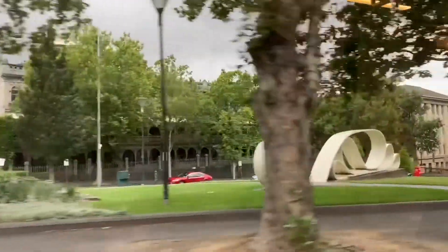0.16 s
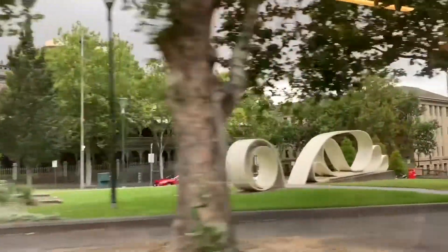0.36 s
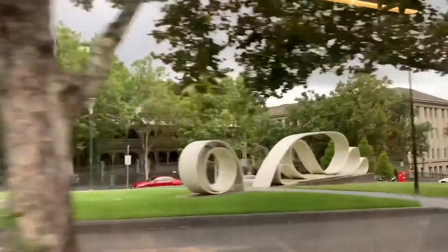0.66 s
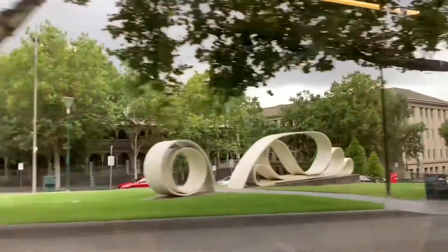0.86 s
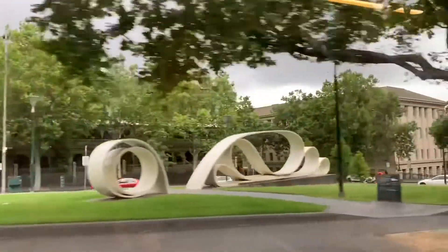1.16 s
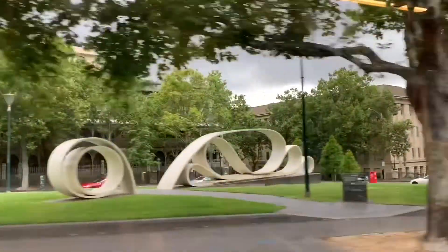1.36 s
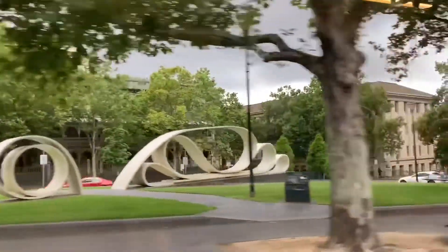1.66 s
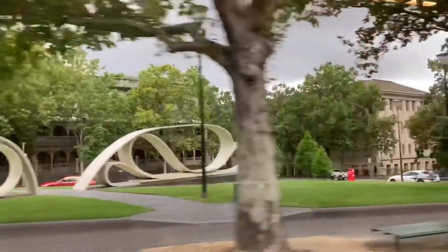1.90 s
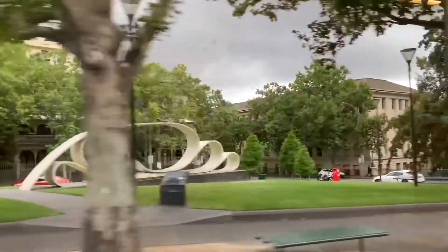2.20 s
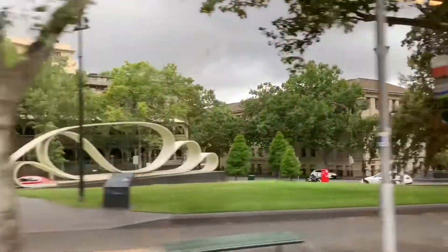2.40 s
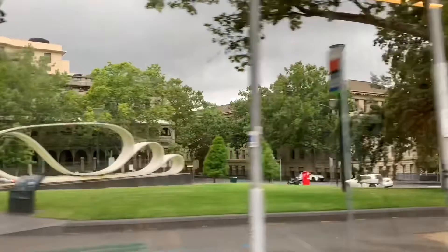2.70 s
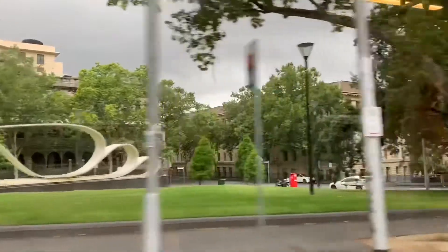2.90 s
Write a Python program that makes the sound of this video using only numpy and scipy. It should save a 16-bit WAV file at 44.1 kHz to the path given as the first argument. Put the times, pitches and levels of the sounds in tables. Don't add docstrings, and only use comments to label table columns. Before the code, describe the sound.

Tram rumbling at steady speed, heard from inside the cabin, with low hum and soft thuds

```python
import sys
import numpy as np
from scipy import signal
from scipy.fft import rfft, irfft, next_fast_len
from scipy.io import wavfile
from scipy.ndimage import uniform_filter1d

SR = 44100
rng = np.random.default_rng(int(sys.argv[2]) if len(sys.argv) > 2 else 0)


def ratio(d):
    e = np.asarray(d, float) / 20
    return 10 ** e


def int16_out(signal):
    q = np.round(np.clip(np.atleast_2d(signal).T, -1, 1) * 32767)
    wavfile.write(sys.argv[1], SR, q.astype(np.int16))


N = 134505
SKIP_AT_S = 2.75231


def walk(rate):
    hold = int(SR / rate)
    held = np.repeat(rng.standard_normal(N // hold + 1), hold)
    return 1.64 * uniform_filter1d(uniform_filter1d(held, hold), hold)[:N]


def on_log(hz, table, axis=1):
    rows = np.array(table, float)
    return np.interp(np.log(hz + 1), np.log(rows[:, 0]), rows[:, axis])


def in_time(table):
    rows = np.array(table, float)
    return np.interp(np.arange(N) / SR, rows[:, 0], rows[:, 1])


def swing(table):
    level = in_time(table)
    return level - level.mean()


# frequency in Hz, likeness 0-1,
# lead of the right port in rad, left over right in dB.
PORTS = [(40.2, 0.99, 0, 2), (177, 0.92, 0.45, -2), (310, 0.48, 0.05, -0.5), (520, 0.26, -1, 0.5),
         (925, 0.23, -1, 0), (1420, 0.41, -3.5, 0), (2500, 0.3, -4.5, -1), (4560, 0.22, -5.5, -1),
         (6440, 0.26, -9.5, -3.5)]


def noise(colour, swell_db, flicker_db, point=False):
    size = next_fast_len(N)
    hz = np.fft.rfftfreq(size, 1 / SR)
    common, separate = rfft(rng.standard_normal((2, size)))
    if point:
        lag_s, in_phase_hz = 0.00022, 9400
        like, pan_db = 0.985, 0 * hz
        lead = 2 * np.pi * (hz - in_phase_hz) * lag_s
    else:
        like, lead, pan_db = (on_log(hz, PORTS, axis=k) for k in (1, 2, 3))
    like = np.clip(like, 0, 1)
    left = common * ratio(pan_db / 2)
    right = like * np.exp(1j * lead) * common + np.sqrt(1 - like ** 2) * separate
    pair = np.array([left, right * ratio(-pan_db / 2)])
    pair *= ratio(on_log(hz, colour)) * np.sqrt(SR / 2)

    ripple_hz, ripple_db = 27.96, 2.5
    comb = rng.standard_normal(int(SR / 2 / ripple_hz) + 2)
    depth_db = ripple_db * np.clip(hz / 900, 0, 1) / (1 + hz / 5000)
    pair *= ratio(depth_db * np.interp(hz / ripple_hz, np.arange(len(comb)), comb))

    lowest, highest = colour[0][0], colour[-1][0]
    half_octaves = 2 * np.log2((hz + 1) / lowest)
    out = 0
    for k in range(int(2 * np.log2(highest / lowest)) + 1):
        band = np.cos(np.pi / 2 * np.clip(half_octaves - k, -1, 1)) ** 2
        out = out + irfft(pair * band, size)[:, :N] * ratio(swell_db + flicker_db * walk(8.72))
    return out


def tone(phase, db, lead, pan_db):
    left = ratio(pan_db / 2) * np.sin(phase)
    right = ratio(-pan_db / 2) * np.sin(phase + lead)
    return np.sqrt(2) * ratio(db) * np.array([left, right])


def ring(at, hz, db, length, lead, pan_db):
    t = np.arange(N) / SR - at
    return tone(2 * np.pi * hz * t, db, lead, pan_db) * np.exp(-(2.59 * t / length) ** 2)


# frequency in Hz, density in dB per Hz.
RUSH = [(1500, -81), (2300, -87), (3000, -85), (3600, -87), (4100, -84.5), (5000, -86), (5400, -95.5),
        (7500, -88.5)]
# frequency in Hz, density in dB per Hz.
VENT = [(5500, -100), (7300, -93.5), (8600, -89.5), (10000, -97.5), (12500, -100), (13800, -108),
        (15000, -114), (15700, -140)]


def air():
    puff_s, puff_length_s, puff_db = 2.18, 0.04, 2.5
    t = np.arange(N) / SR
    flutter = puff_db * np.exp(-((t - puff_s) / puff_length_s) ** 2)
    flutter = flutter + 0.12 * walk(17.0) + 0.5 * walk(40.5)
    rush = noise(RUSH, flutter, flicker_db=0.54)
    return rush + noise(VENT, 0.42 * flutter, flicker_db=0.1, point=True)


# time in seconds, level in dB.
SHAKE = [(0, -34.5), (.3, -34), (.55, -35.5), (.8, -38), (1.0, -37.5), (1.3, -35.5), (1.55, -37.5),
         (1.85, -35.5), (2.1, -39), (2.4, -36), (2.65, -35), (3.05, -42)]
# frequency in Hz, density in dB per Hz.
BODY = [(300, -73), (450, -59.5), (650, -69.5), (940, -70.5), (1030, -77), (1480, -73), (1620, -86.5),
        (2400, -87)]


def body_panels():
    return noise(BODY, 0.37 * swing(SHAKE) + 0.5 * walk(39.76), flicker_db=1.0)


# time in seconds, frequency in Hz, level in dB, length in seconds,
# lead of the right port in rad.
KNOCKS = [(0.006, 275, -25, 0.011, -0.2), (0.03, 727, -49, 0.089, 0), (0.08, 297, -27.5, 0.053, -0.5),
          (0.086, 454, -30.5, 0.036, 0.5), (0.108, 704, -41.5, 0.089, -1.7),
          (0.156, 295, -28.5, 0.049, -0.0), (0.223, 567, -32.5, 0.028, 1.3), (0.229, 437, -34, 0.058, 0.5),
          (0.235, 290, -29, 0.033, -0.2), (0.267, 775, -45, 0.046, -2), (0.305, 299, -28, 0.025, 0.3),
          (0.331, 448, -34.5, 0.086, -0.1), (0.349, 296, -31.5, 0.036, -0.0), (0.441, 775, -49, 0.028, 0.1),
          (0.505, 300, -26.5, 0.021, 0.8), (0.81, 388, -34.5, 0.027, 0.8), (0.894, 787, -40.5, 0.032, -0.1),
          (0.978, 400, -39.0, 0.052, 3), (1.012, 1050, -48, 0.034, 1.3), (1.187, 1087, -46, 0.053, 1),
          (1.193, 563, -35, 0.053, -3), (1.275, 543, -35, 0.072, -1.7), (1.303, 295, -29, 0.031, 0.1),
          (1.403, 654, -45.5, 0.09, 1.7), (1.417, 230, -31, 0.04, -0.5), (1.429, 530, -36.5, 0.08, -1.7),
          (1.499, 1060, -50.5, 0.027, 1), (1.548, 526, -36.5, 0.034, -1.0), (1.61, 786, -41, 0.026, 0),
          (1.756, 820, -37.5, 0.034, 1.3), (1.852, 762, -42.5, 0.077, 1.5), (1.896, 786, -40, 0.019, 2),
          (1.978, 925, -45.5, 0.023, 5), (2.508, 738, -45, 0.1, 1.5), (2.582, 844, -41, 0.023, -1.7),
          (2.584, 727, -45.0, 0.019, 2.2), (2.618, 1017, -49.0, 0.081, -0.3),
          (2.676, 752, -44.0, 0.047, 3.5), (2.688, 1053, -47, 0.041, 0), (2.754, 237, -35, 0.016, -1.5)]
# time in seconds,
# frequency in Hz, level in dB, length in seconds, lead of the right port in rad.
MORE_BLOWS = [(0.119, 100, -27, 0.035, 0.85), (0.21, 103, -21, .04, 0.082), (.58, 106, -30, 0.057, 0.029),
              (2.53, 106, -26, 0.047, 0.87), (0.749, 137, -23.5, 0.033, 0.5), (1.5, 300, -34, 0.026, -0.55),
              (1.541, 295, -30, 0.028, 0.32), (1.62, 290, -32, 0.027, 0.27), (1.625, 390, -42, 0.017, -.8),
              (1.704, 290, -37, 0.032, 0), (1.795, 260, -34, .022, 0.89), (2.176, 1500, -40, 0.0099, 1.34),
              (0.45, 280, -34, 0.035, 0), (1.085, 289, -30.5, 0.048, 0), (.935, 285, -33, .03, 0.16),
              (1.2, 302, -33.5, .03, 0.15), (.6, 285, -33.5, 0.045, 0.17), (2.95, 290, -35.5, 0.066, 0.21),
              (.95, 630, -41, .03, -1), (.96, 930, -45, 0.033, -0.85), (1.225, 490, -36, .025, -1),
              (0.46, 100, -31, 0.041, 0.62), (1.1, 600, -41, 0.033, -1), (1.83, 187, -33.5, .04, .3),
              (2.2, 980, -39, 0.0092, 1), (2.39, 300, -35.5, 0.058, -0.14), (2.48, 295, -34, 0.044, 0.16),
              (2.671, 305, -33, 0.047, -0.099), (2.715, 287, -32.5, 0.029, 0)]


def fittings():
    return sum(ring(*row, pan_db=-0.56) for table in (KNOCKS, MORE_BLOWS) for row in table)


# time in seconds, level in dB.
TRACK = [(0, -22.5), (.15, -24), (.45, -28), (.8, -27), (1.05, -28.5), (1.35, -26), (1.6, -36),
         (2.15, -31.5), (2.3, -28), (2.7, -26.5), (2.85, -29.5), (3.05, -28)]
# frequency in Hz, density in dB per Hz.
ROLL = [(20, -65), (45, -55), (82, -49), (100, -49.5), (165, -50), (215, -60.5), (295, -58), (345, -63)]
# time in seconds, frequency in Hz, level in dB, length in seconds.
THUDS = [(0.016, 161, -31.5, 0.098), (0.056, 158, -31.5, 0.13), (0.15, 160, -22, 0.057),
         (0.166, 130, -27, 0.049), (0.227, 181, -33.0, 0.09), (0.331, 170, -31, 0.045),
         (0.381, 136, -29, 0.033), (0.411, 199, -38.0, 0.032), (0.439, 144, -30, 0.074),
         (0.515, 156.6, -29.5, 0.091), (0.595, 151, -30, 0.044), (0.692, 165.4, -30.5, 0.064),
         (0.86, 153.3, -26.5, 0.13), (0.962, 170, -32.0, 0.035), (1.096, 156, -29, 0.058),
         (1.269, 124, -27, 0.014), (1.279, 161, -27.5, 0.058), (1.439, 152, -26.0, 0.064),
         (1.525, 194, -39, 0.015), (1.616, 164, -32, 0.067), (1.7, 161, -33.5, 0.12),
         (1.734, 208, -39.0, 0.041), (1.804, 151.6, -31.0, 0.056), (1.848, 176, -30, 0.052),
         (1.944, 198, -34, 0.03), (2.011, 170, -33.5, 0.085), (2.199, 171, -30, 0.066),
         (2.301, 168, -19, 0.046), (2.383, 163.4, -27.0, 0.11), (2.474, 143.4, -21.5, 0.085),
         (2.548, 174, -29.5, 0.068), (2.614, 135.6, -22, 0.079), (2.652, 143, -20.5, 0.058),
         (2.696, 129, -19, 0.042), (2.804, 124, -27.0, 0.0091), (2.943, 155, -31.5, 0.12)]


def wheels():
    out = noise(ROLL, 0.67 * swing(TRACK), flicker_db=0.13)
    for row in THUDS:
        lead = 0.67 + 0.55 * rng.standard_normal()
        pan_db = -3.0 + 1.6 * rng.standard_normal()
        out = out + ring(*row, lead, pan_db)
    return out


# time in seconds, level in dB.
MOTOR = [(0.03, -36), (0.08, -27.5), (0.16, -29), (0.21, -21), (0.43, -22), (0.51, -28), (1.03, -27.5),
         (1.29, -31), (1.56, -24), (1.83, -25.5), (1.91, -34.5), (2.01, -23), (2.34, -29), (2.53, -34.5),
         (2.58, -33.5), (3.0, -25)]
# multiple of the shaft rate, level in dB re the first, share of the level swings 0-1.
ORDERS_DB = [(1, 0, 0.75), (2, -3, 0.2), (3, -13.5, 0.63), (4, -23, 0.6)]
# frequency in Hz, level in dB, wobble in dB, lead of the right port in rad,
# share of the shaking 0-1.
TONES = [(283.7, -41.5, 2, 0.66, 0.3), (310, -50, 4, 1.5, 0.9), (445.5, -57, 2, -0.46, 0.5),
         (515, -59.5, 3, -0.058, 0.8), (912, -60, 3, -0.96, 0.3), (1282, -61, 6, 2.3, 0)]


def motor():
    motor_hz, lost_s = 53.66, 0.00458
    t = np.arange(N) / SR
    t = t + lost_s * np.clip((t - SKIP_AT_S) / 0.011 + 0.5, 0, 1)
    mean_db, hum_swing, shake_swing = in_time(MOTOR).mean(), swing(MOTOR), swing(SHAKE)
    turn = 2 * np.pi * (motor_hz * t + 0.021 * walk(3.6))
    out = 0
    for order, db, share in ORDERS_DB:
        level = mean_db + db + share * hum_swing + 1.6 * walk(14)
        out = out + tone(order * turn + 1.305 * order * order, level, lead=0.29, pan_db=-1.9)
    for hz, db, wobble_db, lead, share in TONES:
        phase = 2 * np.pi * hz * t + 0.76 * walk(hz / 40)
        level = db + share * shake_swing + wobble_db * walk(21.6)
        out = out + tone(phase, level, lead, pan_db=-0.4)
    return out


def scene():
    return air() + body_panels() + fittings() + wheels() + motor()


def top_cut(x):
    return signal.sosfilt(signal.butter(12, 16120, fs=SR, output="sos"), x)


# left level in dB, right level in dB.
STEP_DB = (-21.8, -15.6)


def record(dry):
    rise_s, step_fade_s, edge, fade_in_s = 0.000004, 0.0047, 0.18, 0.002
    t = np.arange(N) / SR
    since = t - SKIP_AT_S
    step = np.tanh(since / rise_s) * np.exp(-np.abs(since) / step_fade_s) / 2
    step = step - edge * np.convolve(step, [1, -2, 1], "same")
    ends = np.clip(np.minimum(t, t[-1] - t) / fade_in_s, 0, 1)
    mix = ends * dry - ratio(np.array(STEP_DB))[:, None] * step
    return top_cut(mix)


dry = scene()
out = record(dry)
int16_out(out)
```